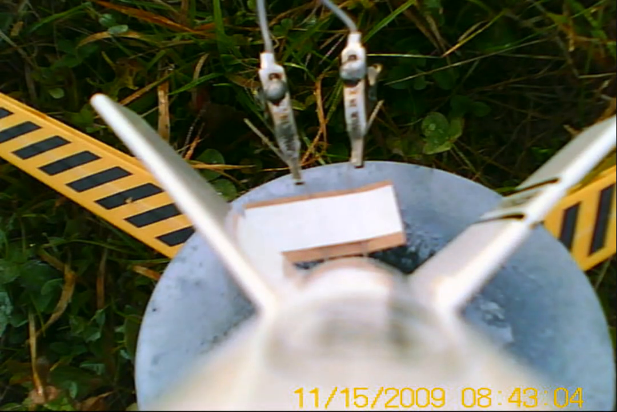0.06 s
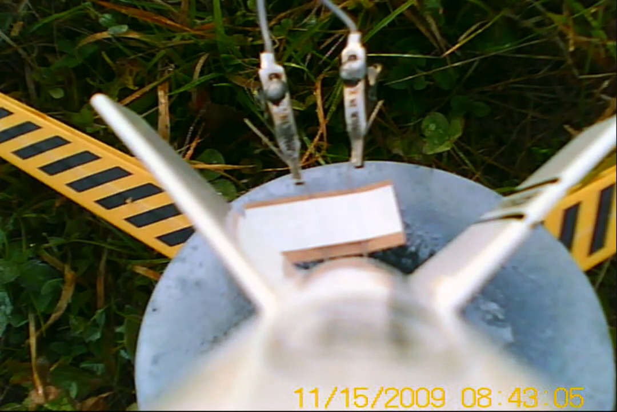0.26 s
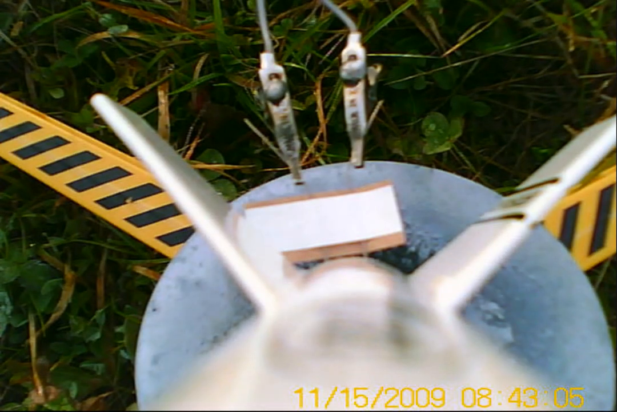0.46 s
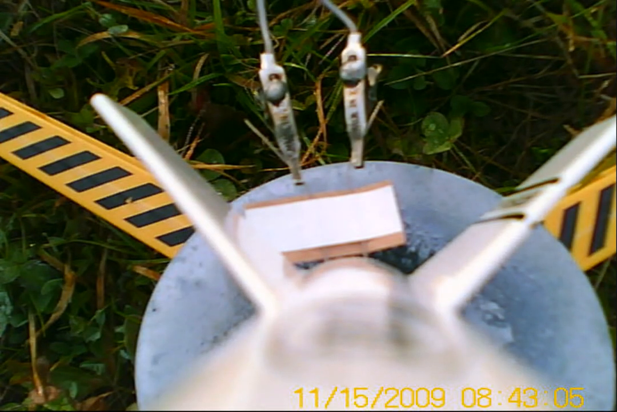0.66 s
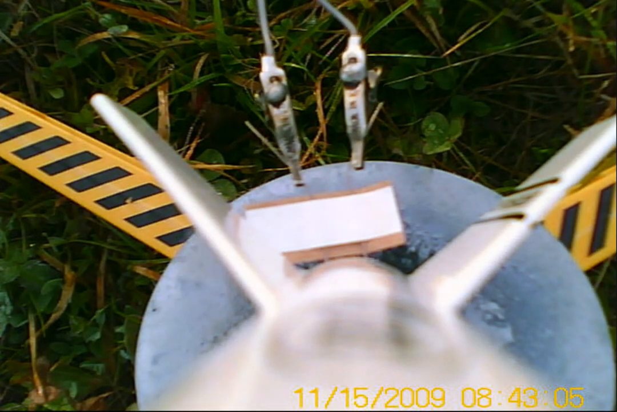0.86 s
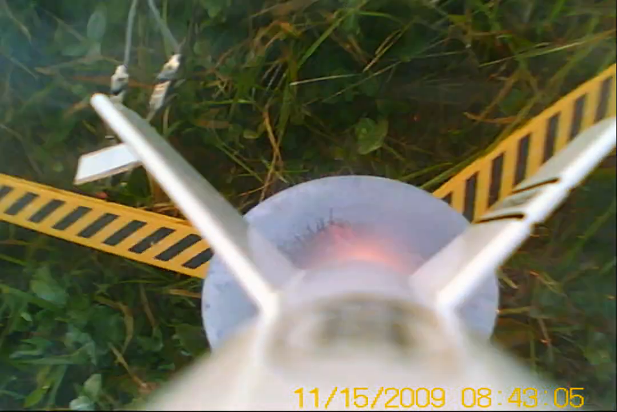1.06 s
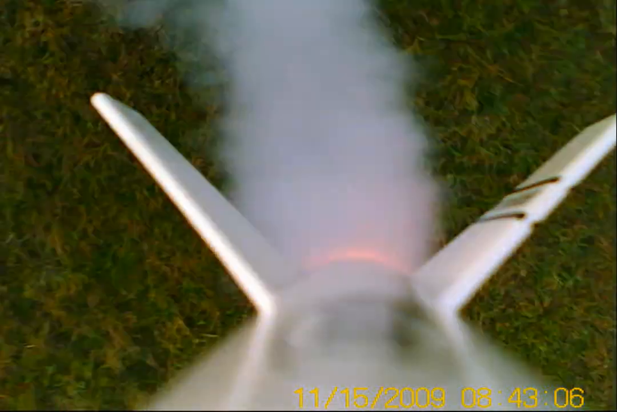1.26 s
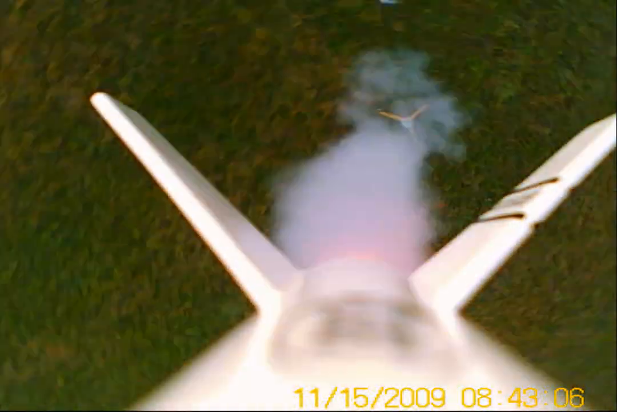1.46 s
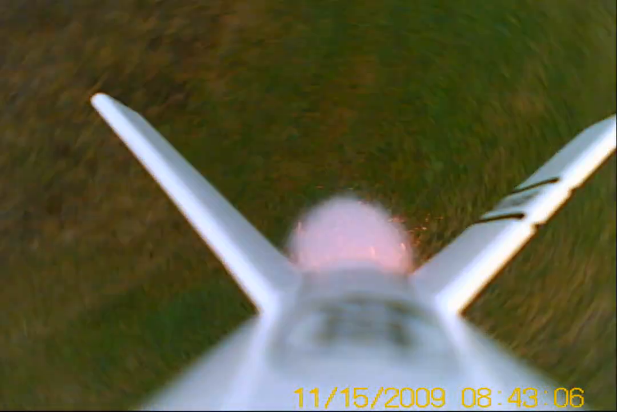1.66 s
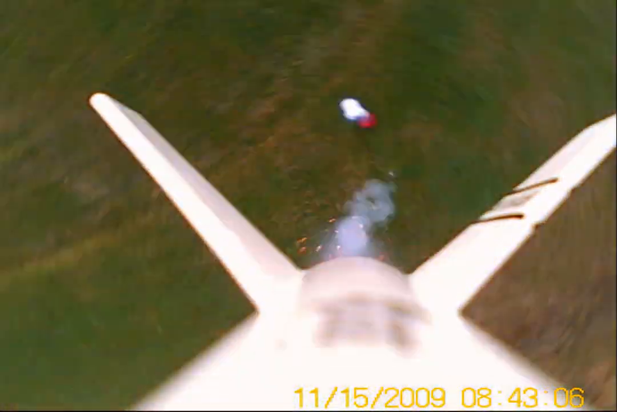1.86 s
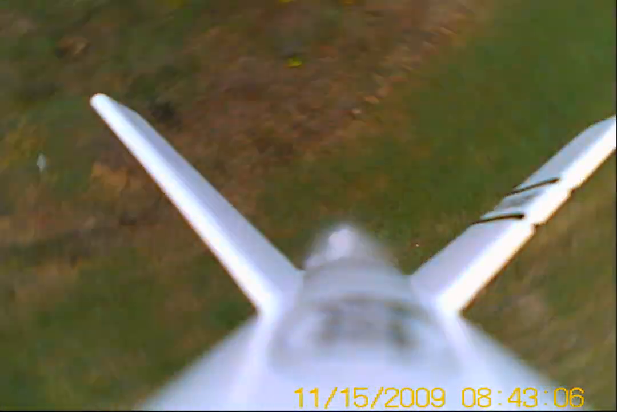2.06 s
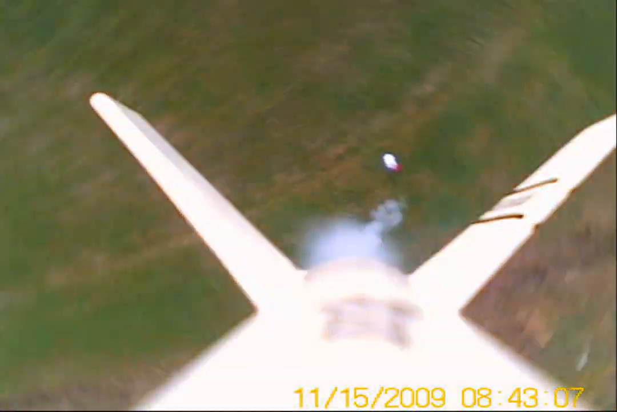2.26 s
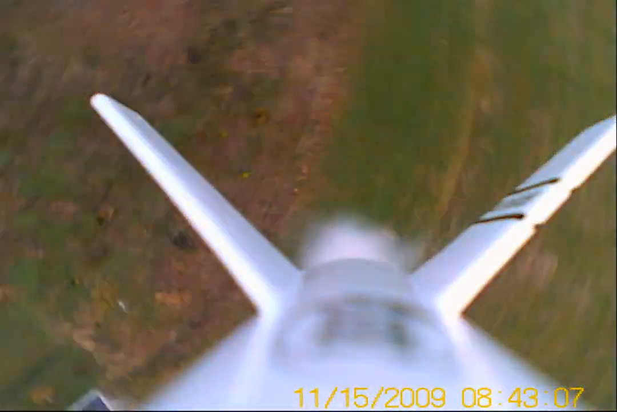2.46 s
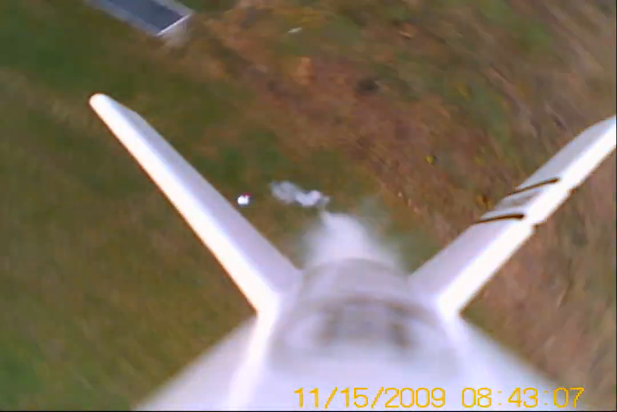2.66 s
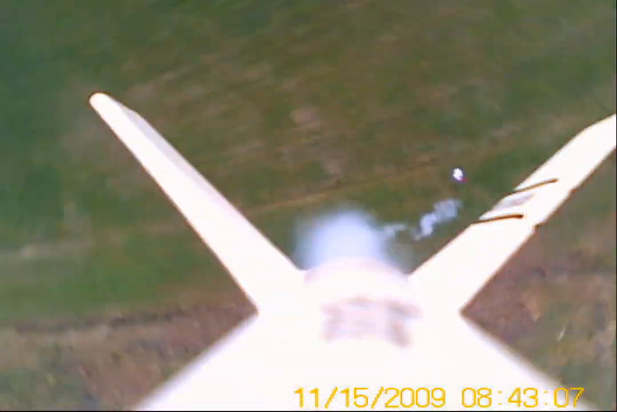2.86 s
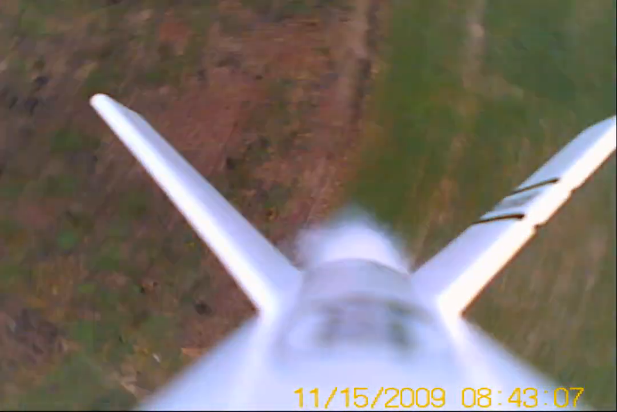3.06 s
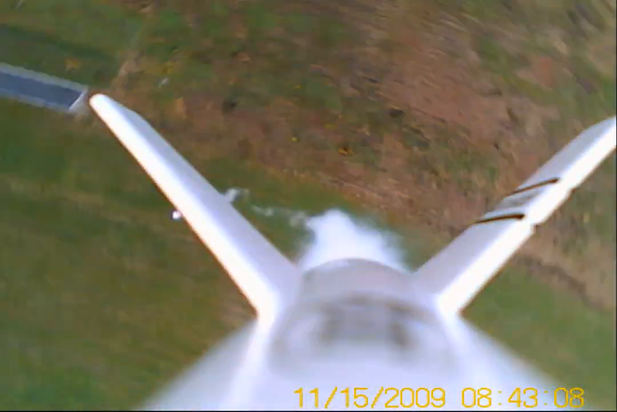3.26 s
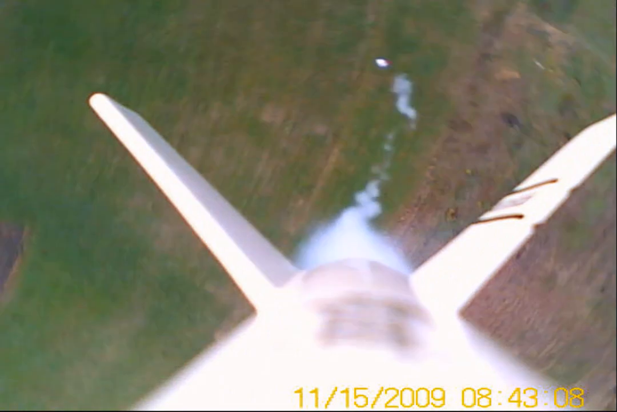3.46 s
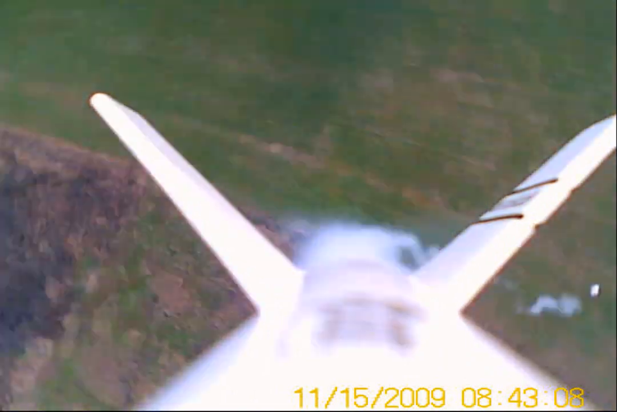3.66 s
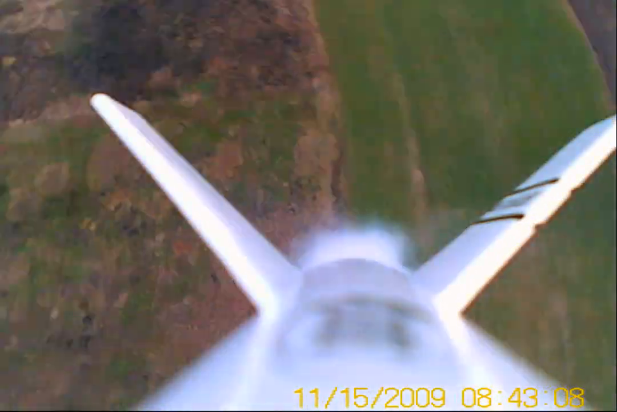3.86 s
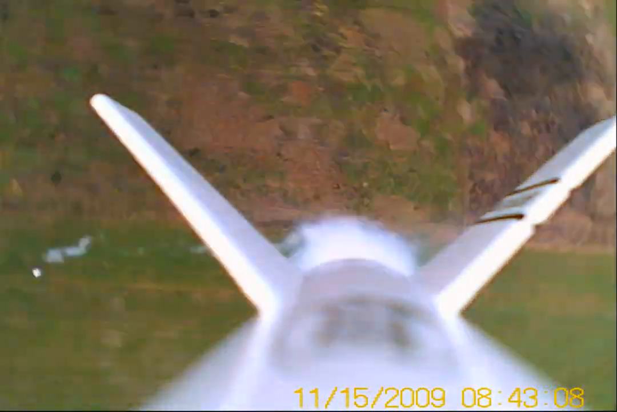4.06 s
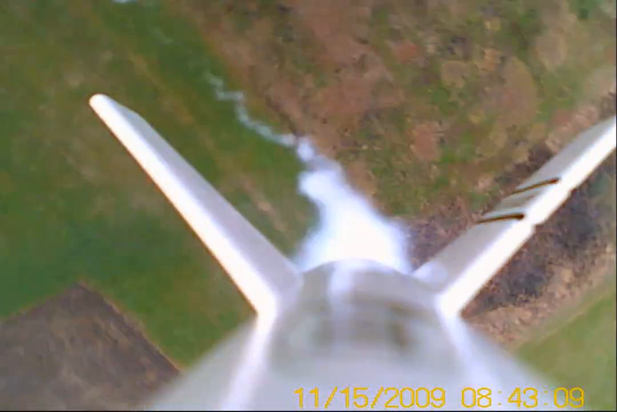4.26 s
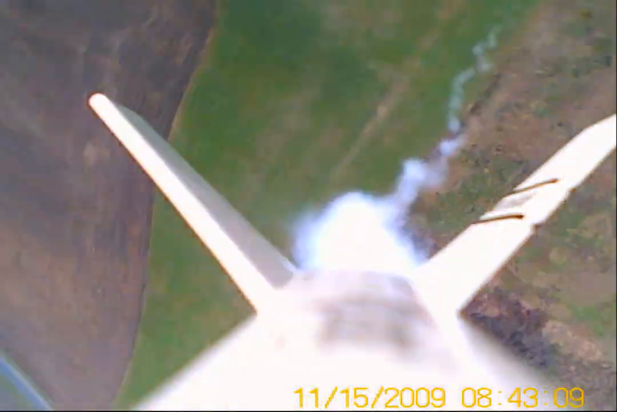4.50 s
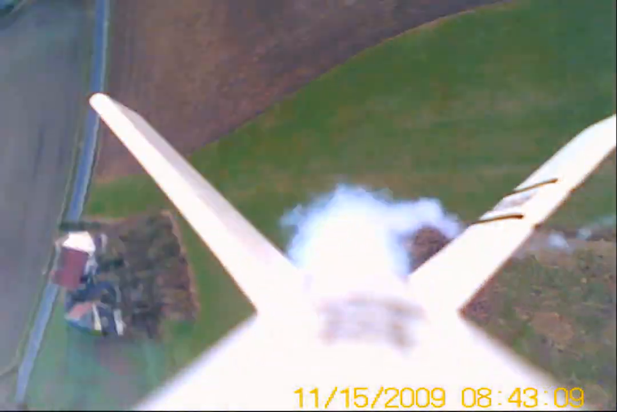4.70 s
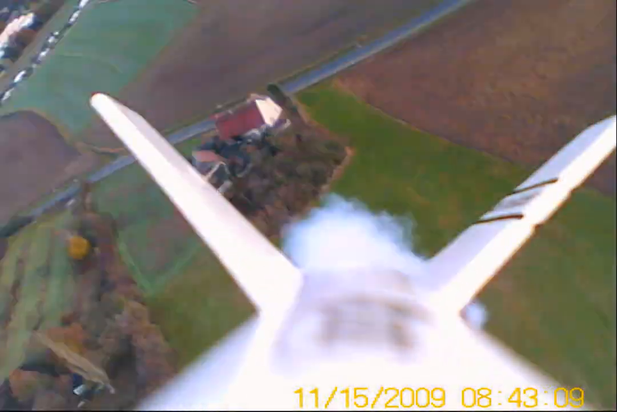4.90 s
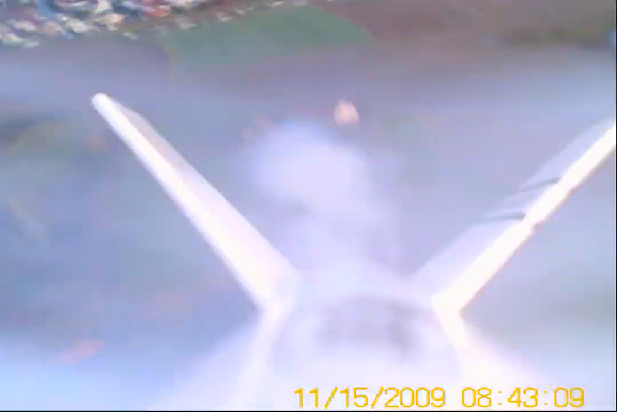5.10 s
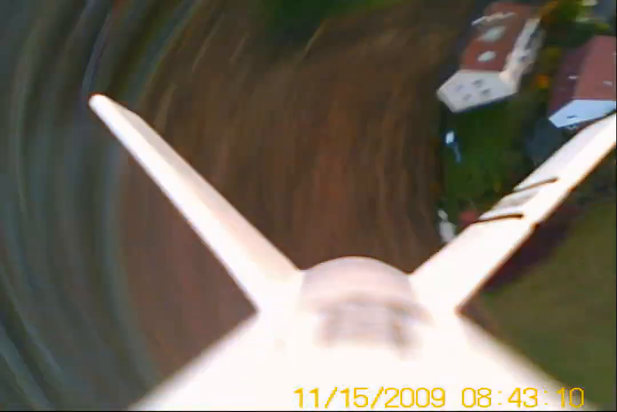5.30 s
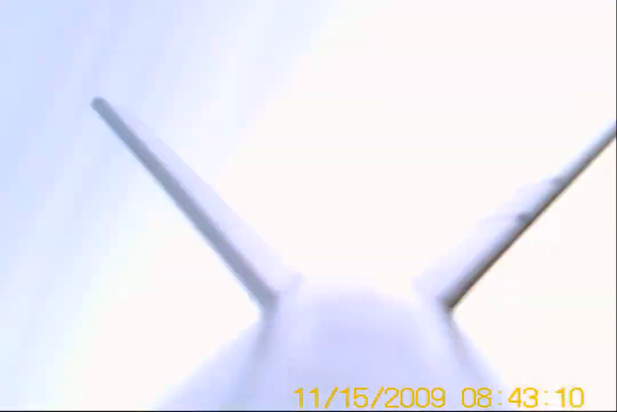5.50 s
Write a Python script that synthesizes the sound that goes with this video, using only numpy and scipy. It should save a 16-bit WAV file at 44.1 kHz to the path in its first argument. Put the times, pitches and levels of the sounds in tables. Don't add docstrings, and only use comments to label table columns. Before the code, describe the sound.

Outdoors, close and lo-fi: nearly a second of hushed field, a spitting fizz, then an abrupt rough blast of jet hiss and rumble lasting a fraction of a second. Low turbulent air over the microphone swells and fades for several seconds, until the ejection charge cracks, plastic-like parts knock, and cloth and gusts slap the tumbling camera.

```python
import sys
import numpy as np
from scipy import signal
from scipy.io import wavfile
from scipy.ndimage import uniform_filter1d

SR = 44100
rng = np.random.default_rng(int(sys.argv[2]) if len(sys.argv) > 2 else 0)


def attenuation_scalar(level_db):
    decades = np.asarray(level_db, float) / 20
    return 10 ** decades


def store_pcm(level_fs):
    pcm = np.round(np.clip(level_fs, -1, 1) * 32767).astype(np.int16)
    wavfile.write(sys.argv[1], SR, np.atleast_2d(pcm).T)


N = 244314


def evened(x):
    return x / np.sqrt(np.mean(x ** 2) + 1e-20)


def read(points, hz):
    f, value = np.transpose(points)
    return np.interp(np.log(hz + 1), np.log(f + 1), value)


def curve(rows, t, column=1, outside=-140):
    rows = np.array(rows)
    return np.interp(t, rows[:, 0], rows[:, column], outside, outside)


def add(mix, s, sound):
    part = mix[round(s * SR):][:len(sound)]
    part += sound[:len(part)]


def resonate(x, hz, width_hz):
    return signal.lfilter(*signal.iirpeak(hz, hz / width_hz, SR), x)


def burst(t, s, db, length_s, rise_s, sag_db_per_s, fade_db_per_s):
    u = np.maximum(t - s, 0)
    late = np.maximum(u - length_s, 0)
    return np.minimum(u / rise_s, 1) * attenuation_scalar(db - sag_db_per_s * u - fade_db_per_s * late)


def bell(t, s, width_s):
    return np.exp(-.5 * ((t - s) / width_s) ** 2)


def noise(points, stretch=None, patchy_db=1.5, flicker_db=1.0):
    frames, hz = N // 256 + 5, np.fft.rfftfreq(1024, 1 / SR)
    a, b, patches = rng.standard_normal((frames, 513, 3)).T
    patches = uniform_filter1d(patches, size=12, axis=0)
    patches = evened(uniform_filter1d(patches, size=8, axis=1))
    factor = np.ones(frames) if stretch is None else stretch(np.arange(frames) * 256 / SR)
    shape = attenuation_scalar(read(points, hz[:, None] / factor))
    shape = shape / np.linalg.norm(shape, axis=0)
    spectra = (a + 1j * b) * shape * attenuation_scalar(patchy_db * patches)
    x = signal.istft(spectra, nperseg=1024, noverlap=768)[1][:N]
    flicker = uniform_filter1d(uniform_filter1d(rng.standard_normal(N), size=250), size=150)
    return evened(x * attenuation_scalar(flicker_db * evened(flicker)))


# t/s, f/Hz, level/dB
BIRD_CALL = [(.14, 990, -80), (.25, 1037, -62), (.36, 1050, -62), (.47, 1027, -65), (.57, 970, -62),
             (.62, 975, -80)]
# f/Hz, density/dB per Hz
FIELD_SPECTRUM = [(20, -41.5), (60, -24), (100, -14), (200, -28), (383, -36), (868, -40), (1020, -36),
                  (1810, -42.5), (4000, -49), (6960, -51), (7540, -51), (10900, -54), (14200, -84)]
# f/Hz, width/Hz, level/dB
ENGINES = [(27.7, 6, -37), (57.8, 18, -39)]
FIELD_DB = -46


def field(t):
    call = np.sin(2 * np.pi * np.cumsum(curve(BIRD_CALL, t, column=1, outside=0)) / SR)
    left_db = np.interp(t, (1., 1.1), (0, -14.5))
    ground = attenuation_scalar(FIELD_DB + left_db) * noise(FIELD_SPECTRUM, patchy_db=0.5, flicker_db=1.0)
    for hz, width_hz, db in ENGINES:
        drone = resonate(resonate(rng.standard_normal(N), hz, width_hz), hz, 2 * width_hz)
        steady = np.tanh(evened(drone))
        ground = ground + attenuation_scalar(db + left_db) * evened(resonate(steady, hz, 2 * width_hz))
    return ground + attenuation_scalar(curve(BIRD_CALL, t, column=2) + 3.0) * call


# f/Hz, width/Hz, level/dB
CAVITY_MODES = [(4950, 900, 0), (2500, 3000, -20)]
# t/s, level/dB
FIZZ_LEVEL = [
    (0.814, -53),
    (0.819, -41),
    (0.846, -36),
    (0.894, -33),
    (0.938, -27.5),
    (0.96, -13.5),
]
# t/s, peak level/dB
SPIT_EVENTS = [(0.829, -27), (0.8455, -29), (0.8555, -18.5), (0.892, -22), (0.9025, -19)]
SPARK_S, CATCH_S, LIT_S = 0.78, 0.902, .938


def igniter(t):
    sparks = (rng.random(N) < 500 / SR) * rng.standard_normal(N) * attenuation_scalar(4.3 * rng.exponential(1, N))
    fizz = evened(rng.standard_normal(N) + 0.35 * evened(sparks))
    spits = np.zeros(N)
    for s, db in SPIT_EVENTS:
        decay = np.exp(-np.arange(200) / 57.0)
        add(spits, s, attenuation_scalar(db + 2.0) * rng.standard_normal(200) * decay)
    drive = attenuation_scalar(curve(FIZZ_LEVEL, t) + 2.5) * fizz + spits
    low = np.zeros(N)
    for hz, width_hz, db in CAVITY_MODES:
        low = low + attenuation_scalar(db + 9.0) * resonate(resonate(drive, hz, width_hz), hz, 2 * width_hz)
    upper_db = np.interp(t, (SPARK_S, CATCH_S, LIT_S), (5, -4, 12))
    cavity = low + attenuation_scalar(upper_db) * resonate(resonate(drive, 7700, 2600), 7800, 3500)
    gap = resonate(cavity, 6650, 1300)
    return cavity - gap + .25 * spits


# t/s, level/dB, length/s
GUST_EVENTS = [
    (5.1, -25, 0.067),
    (5.214, -22.5, 0.01),
    (5.22, -28.5, 0.17),
    (5.404, -20, .006),
    (5.443, -28.5, 0.14),
]
# f/Hz, density/dB per Hz
GUST_SPECTRUM = [(40, -2), (100, 0), (300, -6.5), (1000, -15.5), (2000, -26.5), (4000, -43.5), (7000, -63)]
# t/s, level/dB, length/s
CLOTH_EVENTS = [
    (5.07, -48.5, 0.18),
    (5.225, -44.5, 0.03),
]
# f/Hz, density/dB per Hz
RASP_SPECTRUM = [(300, -15), (1500, -7), (3300, 5.5), (5500, -1), (8500, -1), (10500, -10), (11500, -32)]
CALM_DB, GUST_SAG_DB_PER_S, GUST_FADE_DB_PER_S = -33.5, 51, 900
SLIDE_S, SLIDE_DB, SLIDE_LENGTH_S = 5.095, -27, .032


def tumbling(t):
    blow = sum(burst(t, *row, 0.0031, GUST_SAG_DB_PER_S, GUST_FADE_DB_PER_S) for row in GUST_EVENTS)
    blow = blow + attenuation_scalar(CALM_DB) * (t > SLIDE_S)
    gusts = attenuation_scalar(0.5) * blow * noise(GUST_SPECTRUM, patchy_db=1.4, flicker_db=1.5)
    cloth = sum(burst(t, *row, .015, 25, 340) for row in CLOTH_EVENTS) + attenuation_scalar(-65) * (t > SLIDE_S)
    return gusts + attenuation_scalar(2.5) * cloth * noise(RASP_SPECTRUM, patchy_db=2.0, flicker_db=2.9)


# t/s, pressure/full scale, core width/s
SWIRLS = [(.9585, -.15, .0033), (1.352, -0.33, .006), (1.376, -0.39, 0.0081), (1.405, -0.63, 0.0018),
          (1.427, 0.34, 0.007), (1.7665, -0.75, 0.0012), (1.788, -0.78, .0004), (1.8117, -1.1, 0.0008),
          (1.827, -0.79, 0.00062), (5.11, 0.35, 0.00058), (5.1341, -0.72, 0.00079), (5.148, 0.31, 0.0062),
          (5.161, .9, 0.00099), (5.171, -.3, 0.0026), (5.2, -0.49, 0.0036), (5.218, -0.64, 0.00057),
          (5.223, 0.69, 0.0023), (5.228, -.9, 0.0049), (5.2419, -0.74, 0.00072), (5.2525, -0.96, 0.0045),
          (5.279, -0.13, 0.0022), (5.29, -0.38, .0015), (5.298, -0.46, 0.0017), (5.317, -0.75, 0.0026),
          (5.361, -.4, 0.0033), (5.388, -.25, 0.0038), (5.399, 0.59, 0.0037), (5.4069, -0.99, 0.00099),
          (5.421, 0.65, 0.0055), (5.472, -0.16, .0026)]
RIM_SHARE, RIM_WIDTH = 0.41, 2.33


def pushes(t):
    total = np.zeros(N)
    for s, pressure, width_s in SWIRLS:
        rim = RIM_SHARE * bell(t, s, RIM_WIDTH * width_s)
        total = total + pressure * (bell(t, s, width_s) - rim)
    return total


# t/s, peak level/dB, ring f/Hz, swell/s, crackle share/0-1
KNOCK_EVENTS = [(5.1078, -11, 3180, 0.0011, 0.7), (5.112, -20, 3700, 0.00062, .3),
                (5.1145, -21, 2000, .0007, 0.2), (5.117, -22, 3020, .0007, 0.3),
                (5.127, 3, 860, 0.00087, 0.68), (5.1285, 8.5, 1570, 0.00038, 0.4),
                (5.1304, -12, 3330, 0.00061, 0), (5.1334, -20, 8000, 0.00051, 0.4),
                (5.141, -3, 2080, 0.00059, 0.03), (5.1416, -9, 3560, 0.00071, 0.45),
                (5.146, -5, 1310, 0.0001, 0), (5.2303, -17, 3740, 0.00077, 0.72),
                (5.237, -29, 3800, 0.0012, 0.6), (5.253, -18, 1600, 0.00093, 0.4),
                (5.27, -31, 6800, 0.00086, 0.3), (5.2992, -21.5, 3600, 0.00035, 0.5),
                (5.49, -39, 6500, 0.00061, 0.7), (5.5385, -32, 3000, 0.00068, 0.7)]


def ejection(t):
    slide = burst(t, SLIDE_S, SLIDE_DB, SLIDE_LENGTH_S, .005, 30, 460)
    out = slide * noise(RASP_SPECTRUM, patchy_db=2.0, flicker_db=2.5)
    u = np.arange(1500) / SR
    for s, db, hz, swell_s, crackle in KNOCK_EVENTS:
        ring = (crackle - 1) * np.sin(2 * np.pi * hz * u)
        ring = ring + crackle * 0.62 * rng.standard_normal(len(u))
        add(out, s, ring * attenuation_scalar(db) * u / swell_s * np.exp(1 - u / swell_s))
    return out


# t/s, level/dB
THRUST_LEVEL = [(.9, -26), (.941, -44), (.954, -6), (1.008, -12.5), (1.04, -10.5), (1.157, -10.5),
                (1.17, -18), (1.25, -22.5), (1.5, -47)]
# t/s, extra level/dB, length/s
BURN_SURGES = [(0.973, 1.5, 0.0099), (0.981, -4, 0.006), (0.997, 0.5, .005), (1.047, 7, 0.0038),
               (1.059, -4.5, 0.0054), (1.08, 2.5, 0.0091), (1.122, 3, 0.0024), (1.132, -4, 0.005),
               (1.14, -1, 0.0082), (1.147, 3.5, 0.0022)]
# f/Hz, density/dB per Hz
JET_SPECTRUM = [(1760, -9), (3000, -5), (4900, 1), (6050, 2), (8460, 4.5), (10000, 0), (10900, -3),
                (14200, -46), (22000, -120)]
# f/Hz, density/dB per Hz
PLUME_SPECTRUM = [(200, -7.5), (450, -3), (1100, -4), (1700, -3), (2670, -5.5), (3600, -9.5), (6000, -16.5)]
# f/Hz, density/dB per Hz
PLATE_SPECTRUM = [(20, 0.5), (64, 1.5), (170, -10.5), (340, -6.5), (700, -27.5)]
# t/s, level/dB
PLATE_JUMPS = [
    (.953, -15),
    (1.035, -17),
    (1.118, -22),
    (1.152, -18),
]
FULL_DB = -10
ROAR_DB, ROAR_FOLLOWS = -15.5, 0.25
HOWL_DB, HOWL_FOLLOWS = -18.5, 1.1
NEAR_S, NEAR_DB, NEAR_WIDTH_S = 0.98, 13, 0.016
PLATE_DB, JUMP_FADE_DB_PER_S = -45.5, 354
CLEAR_S = 1.163


def motor(t):
    surge_db = sum(db * bell(t, s, length_s) for s, db, length_s in BURN_SURGES)
    thrust_db = curve(THRUST_LEVEL, t)
    over_db = thrust_db - FULL_DB
    hiss = attenuation_scalar(thrust_db + 1.5) * noise(JET_SPECTRUM, patchy_db=2.5, flicker_db=-0.5)
    roar = attenuation_scalar(ROAR_DB + ROAR_FOLLOWS * over_db) * noise(PLUME_SPECTRUM, patchy_db=2.5, flicker_db=1.4)
    roar = roar - (t > CLEAR_S) * 0.61 * resonate(roar, 290, 690)
    jumps = sum(burst(t, s, db, 0.0069, 0.011, 0, JUMP_FADE_DB_PER_S) for s, db in PLATE_JUMPS)
    rumble = jumps + attenuation_scalar(PLATE_DB) * (t > LIT_S)
    rumble = rumble * noise(PLATE_SPECTRUM, patchy_db=1.0, flicker_db=2.5)
    near_db = NEAR_DB * bell(t, NEAR_S, NEAR_WIDTH_S)
    howl_db = HOWL_DB + HOWL_FOLLOWS * np.minimum(over_db, 0) + near_db
    roar = roar + attenuation_scalar(howl_db) * evened(resonate(rng.standard_normal(N), 2610, 900))
    roar = roar * np.clip((t - .885) / 0.13, 0, 1) ** 1.3
    hiss = hiss * np.clip((t - .92) / 0.064, 0, 1) ** 2
    burnout = np.sqrt(np.clip((1.5 - t) / .2, 0, 1))
    return attenuation_scalar(surge_db) * (hiss + roar + rumble) * burnout


# t/s, ratio to the reference speed
AIR_SPEED = [(1.2, 0.43), (1.45, 1.26), (1.75, 1.12), (2.3, 0.87), (3, 0.67), (3.8, 0.53), (4.5, 0.46),
             (5.09, 0.42)]
# t/s, level/dB
RUSH_LEVEL = [(1.25, -8), (1.31, -16), (1.45, -22), (1.64, -15.5), (1.76, -14.5), (1.88, -15.5),
              (2.6, -19.5), (3.15, -22.5), (3.56, -23.5), (4.0, -26), (4.55, -28.5), (4.84, -29),
              (5.01, -31.5), (5.1, -28.5)]
# f/Hz, density/dB per Hz
EDDY_SPECTRUM = [(15, 2.5), (30, -0.5), (100, 1), (300, -2.5), (800, -8.5), (1800, -14.5), (2700, -28),
                 (4500, -77)]
# f/Hz, density/dB per Hz
PORT_SPECTRUM = [(600, -22), (1200, 1), (2100, -0.5), (2800, -3.5), (3400, -2), (3800, -0.5), (4400, -4.5),
                 (5200, -12.5), (8000, -34)]
# f/Hz, density/dB per Hz
HISS_SPECTRUM = [(1500, -7.5), (3000, 1), (6000, -1.5), (8500, -1.5), (9800, -8.5), (11000, -13.5)]
REFERENCE_RUSH_DB = -15
PORT_DB, PORT_FOLLOWS = -30.5, 1
HISS_DB, HISS_FOLLOWS = -30, 1.504
AFTERBURN_DB, AFTERBURN_DB_PER_S = -26, 24.5


def airflow(t):
    eddies = noise(EDDY_SPECTRUM, lambda s: curve(AIR_SPEED, s, outside=0.63), patchy_db=1.0, flicker_db=0.03)
    suction = .115 * curve(AIR_SPEED, t, outside=0)
    eddies = attenuation_scalar(1.07) * (eddies - suction * (eddies ** 2 - 1))
    port = attenuation_scalar(2.5) * noise(PORT_SPECTRUM, patchy_db=0.8, flicker_db=0.4)
    hiss = attenuation_scalar(3.5) * noise(HISS_SPECTRUM, patchy_db=-0.7, flicker_db=0.2)
    rush_db = curve(RUSH_LEVEL, t)
    over_db = rush_db - REFERENCE_RUSH_DB
    burn = attenuation_scalar(AFTERBURN_DB - AFTERBURN_DB_PER_S * abs(t - RUSH_LEVEL[0][0]))
    layers = attenuation_scalar(rush_db) * eddies + attenuation_scalar(PORT_DB + PORT_FOLLOWS * over_db) * port
    layers = layers + np.hypot(attenuation_scalar(HISS_DB + HISS_FOLLOWS * over_db), burn) * hiss
    return layers * np.clip((t - 1.25) / .2, 0, 1)


def scene():
    t = np.arange(N) / SR
    ground = field(t) + igniter(t)
    descent = tumbling(t) + pushes(t) + ejection(t)
    return (ground + descent + motor(t) + airflow(t))[None]


def low_pass(x):
    return signal.sosfilt(signal.butter(12, 16000, fs=SR, output="sos"), x)


OFFSET = -.0092
EDGE_HZ = 10720


def record(dry):
    lowpass = signal.firwin(151, EDGE_HZ, window=("kaiser", 10), fs=SR)
    band = signal.oaconvolve(dry + OFFSET, lowpass[None], "same")
    over = np.maximum(abs(band) - .8, 0)
    bent = band - np.sign(band) * (over - .2 * np.tanh(over / .2))
    return low_pass(bent)


dry = scene()
out = record(dry)
store_pcm(out)
```